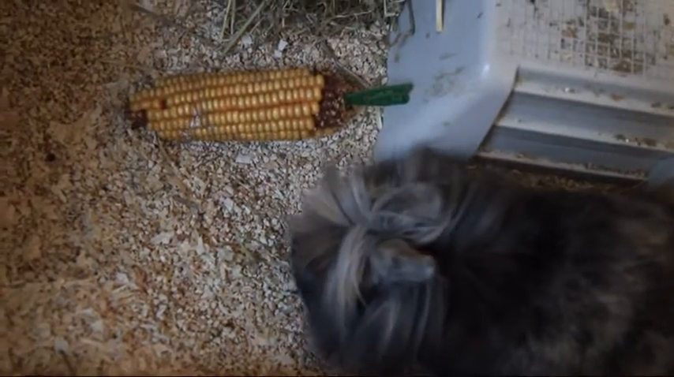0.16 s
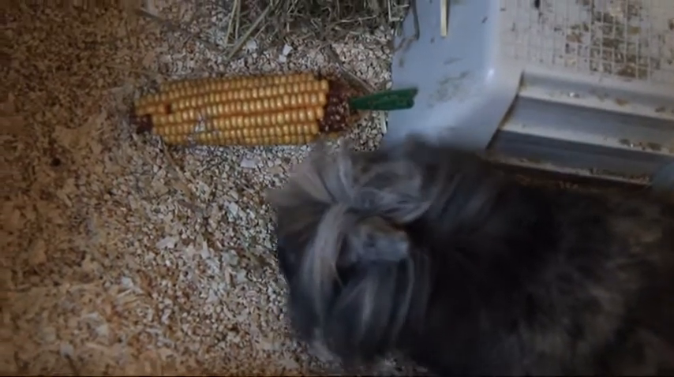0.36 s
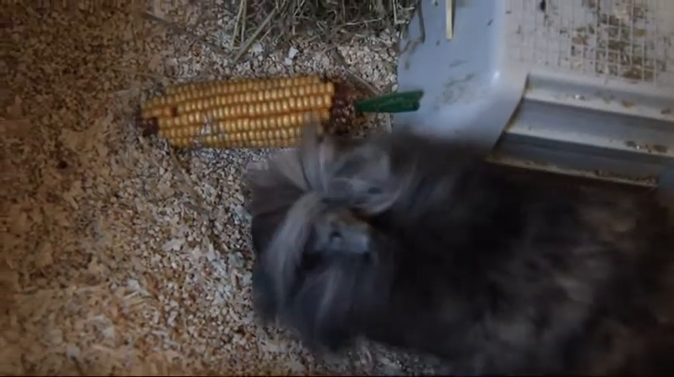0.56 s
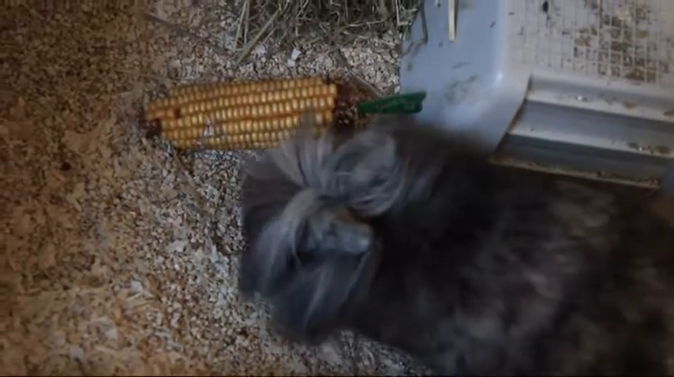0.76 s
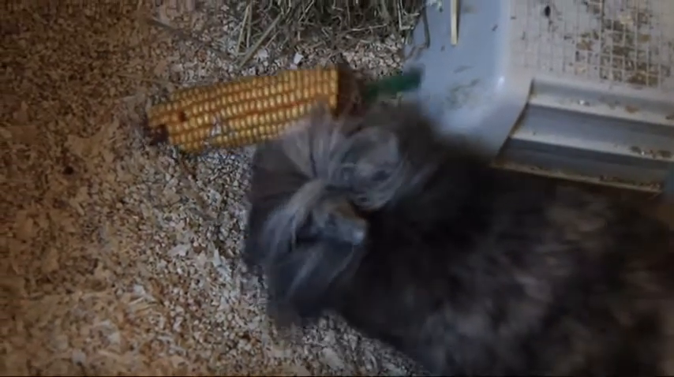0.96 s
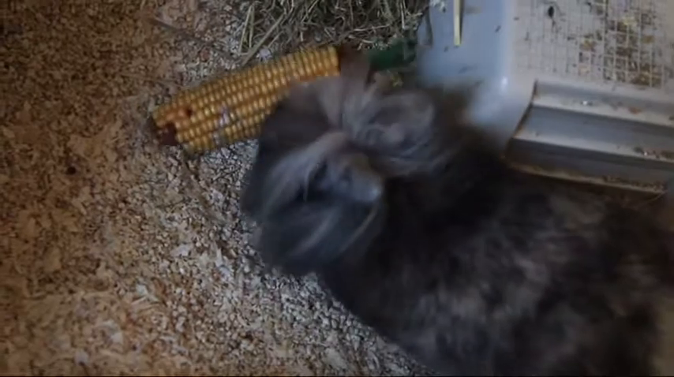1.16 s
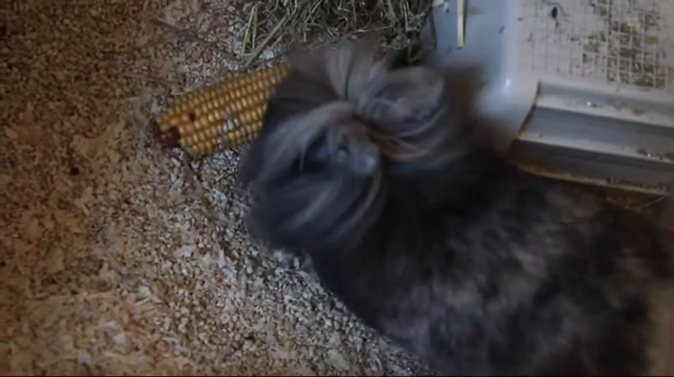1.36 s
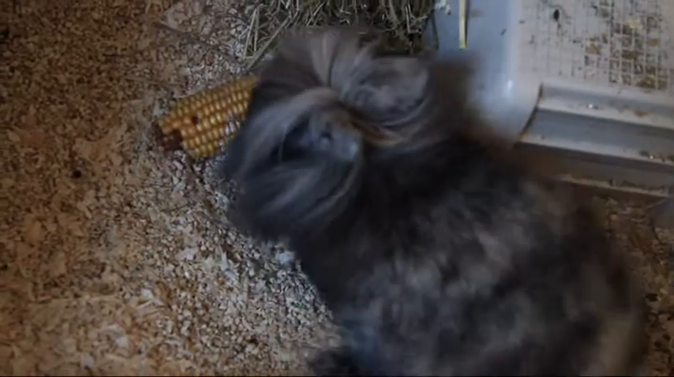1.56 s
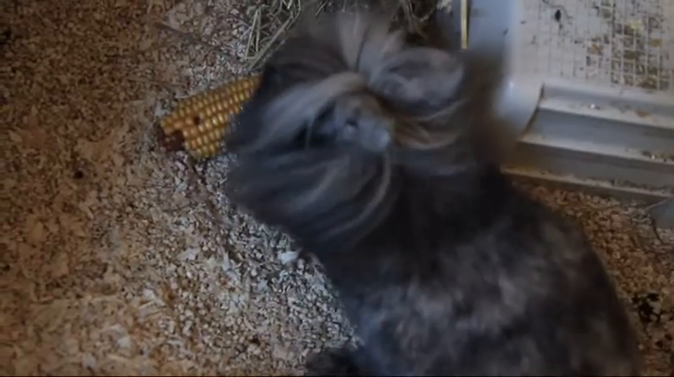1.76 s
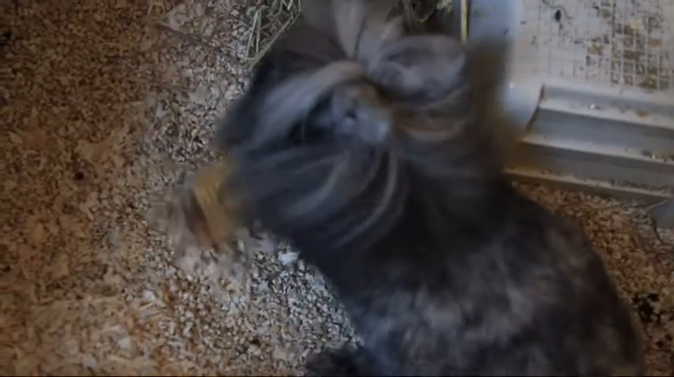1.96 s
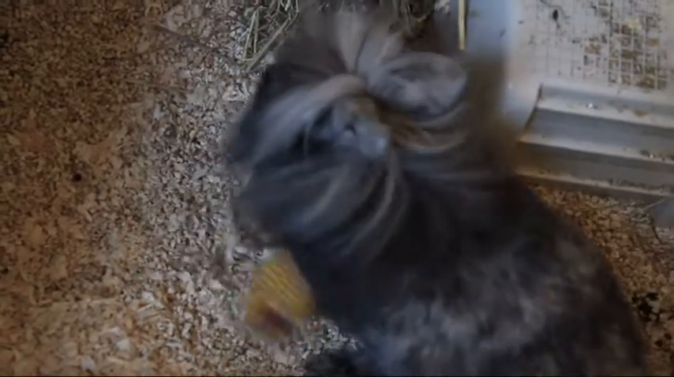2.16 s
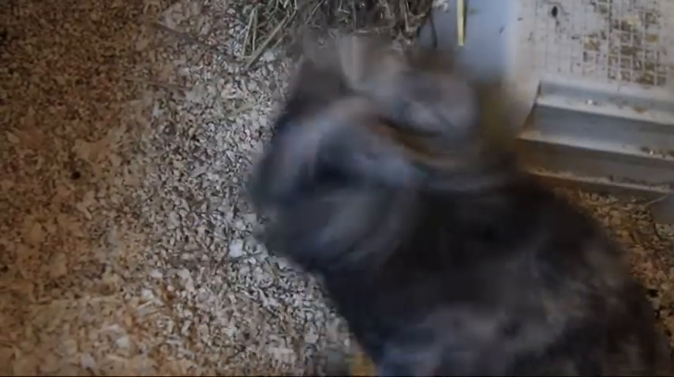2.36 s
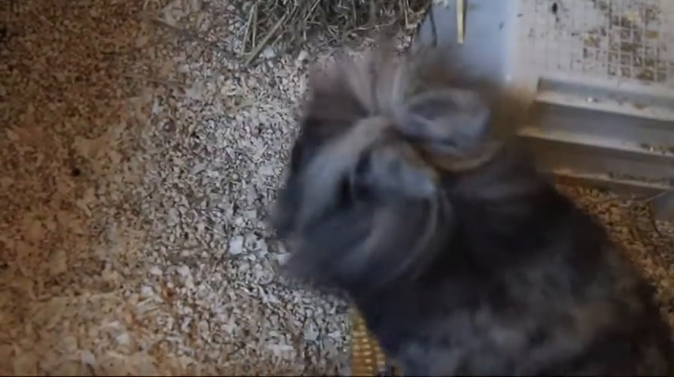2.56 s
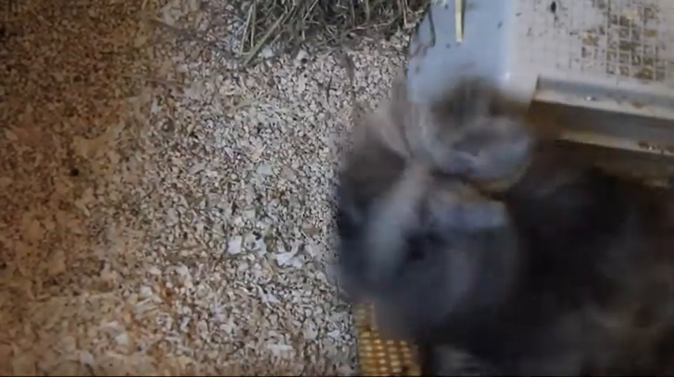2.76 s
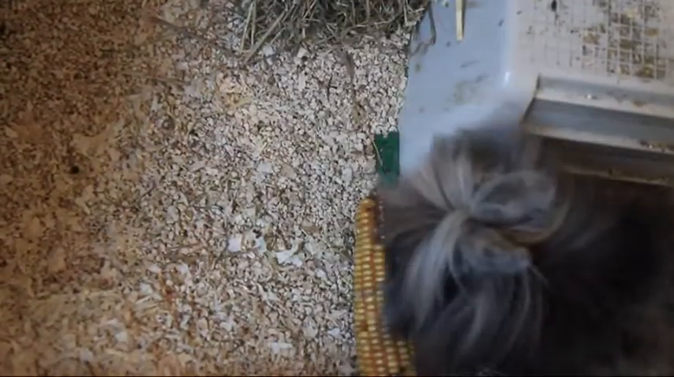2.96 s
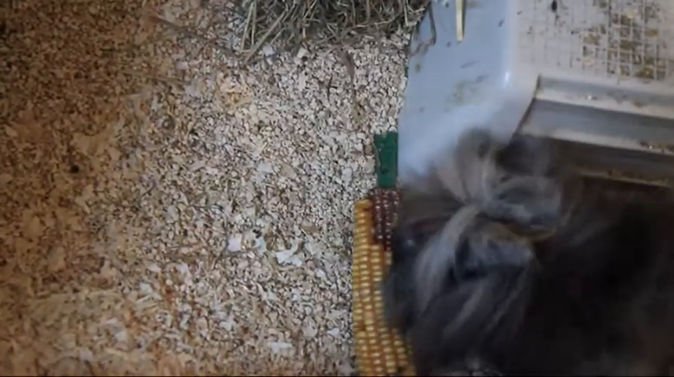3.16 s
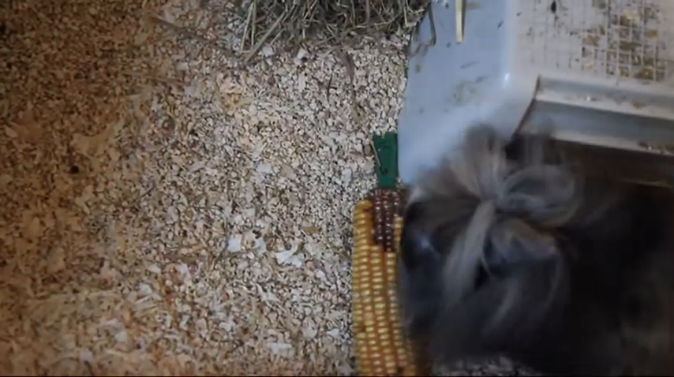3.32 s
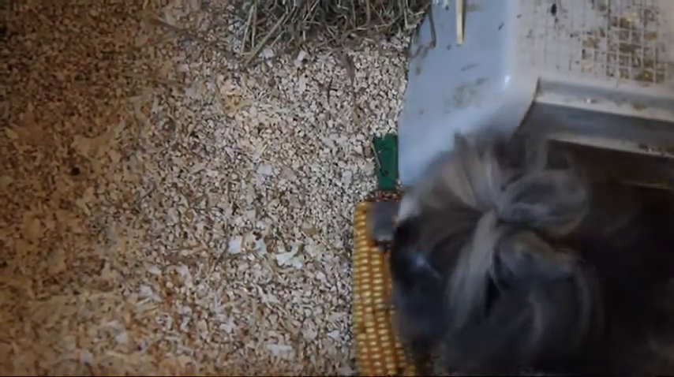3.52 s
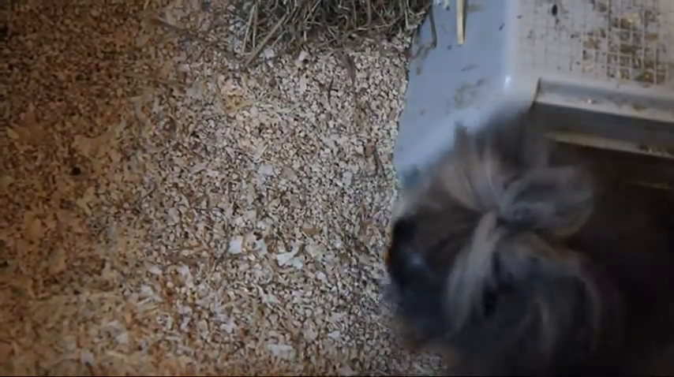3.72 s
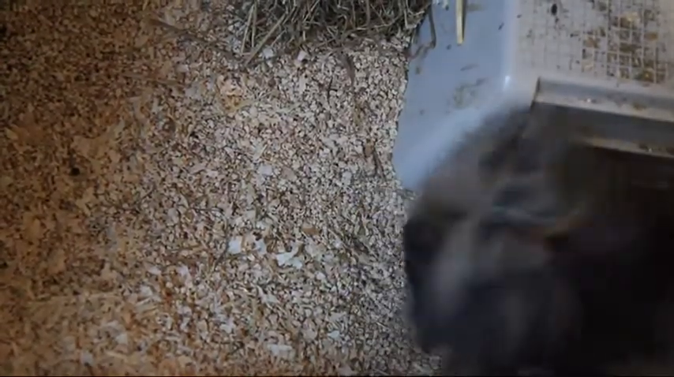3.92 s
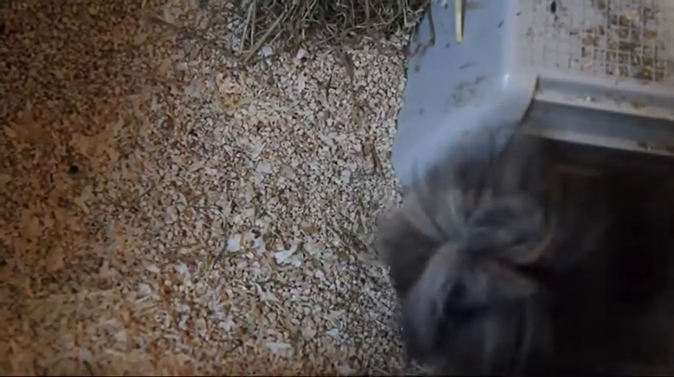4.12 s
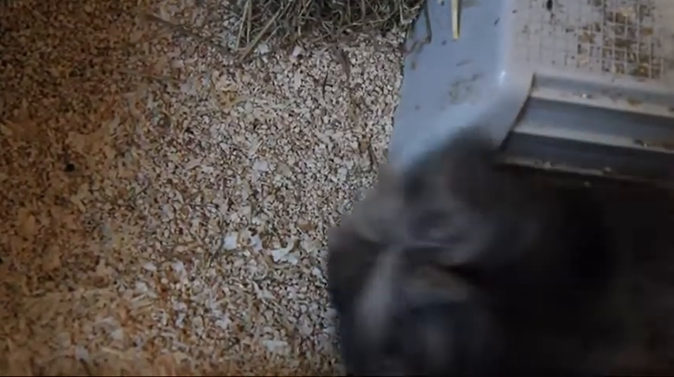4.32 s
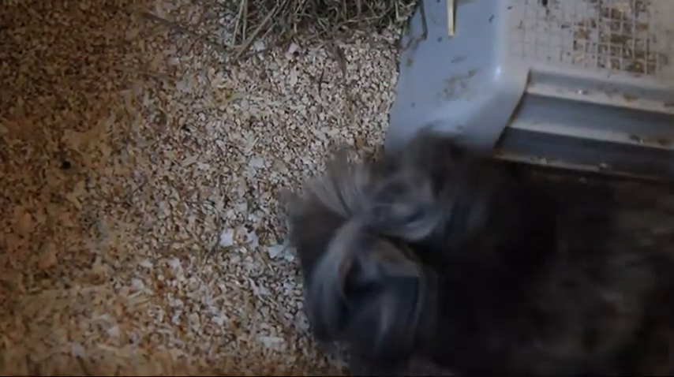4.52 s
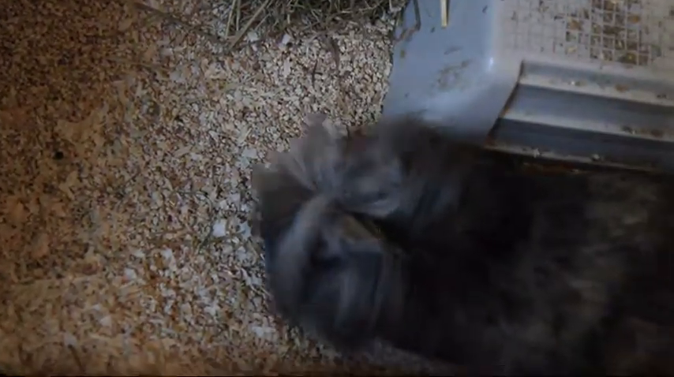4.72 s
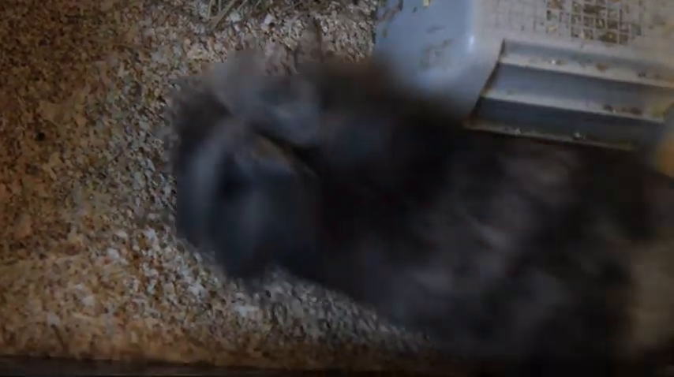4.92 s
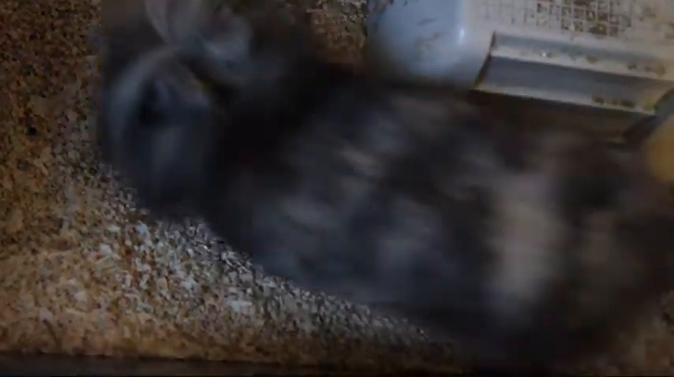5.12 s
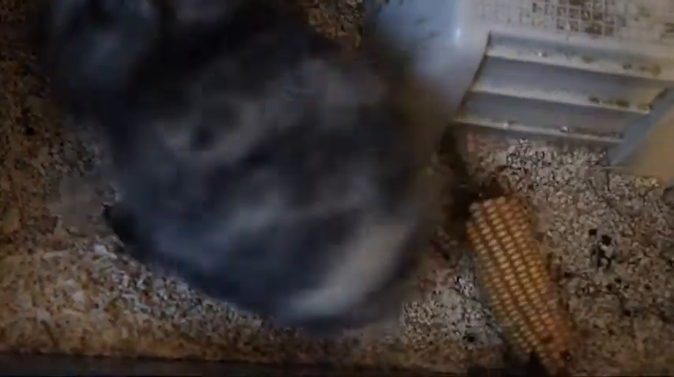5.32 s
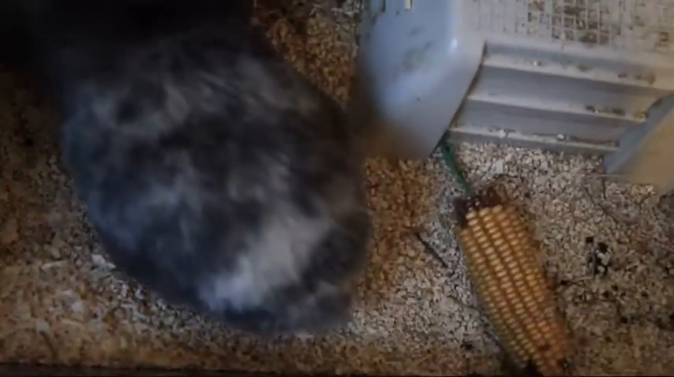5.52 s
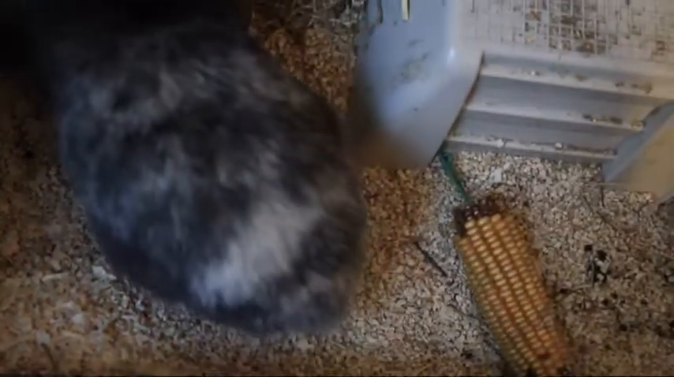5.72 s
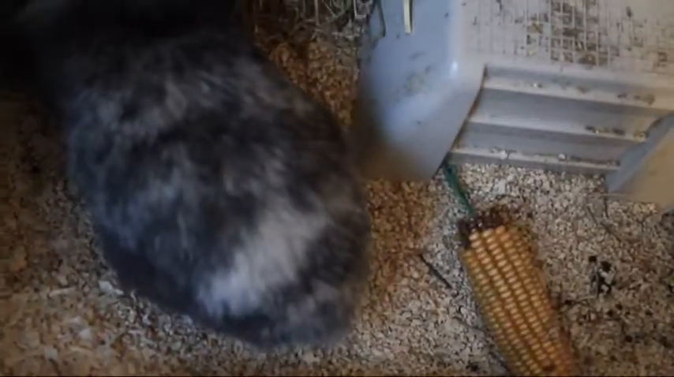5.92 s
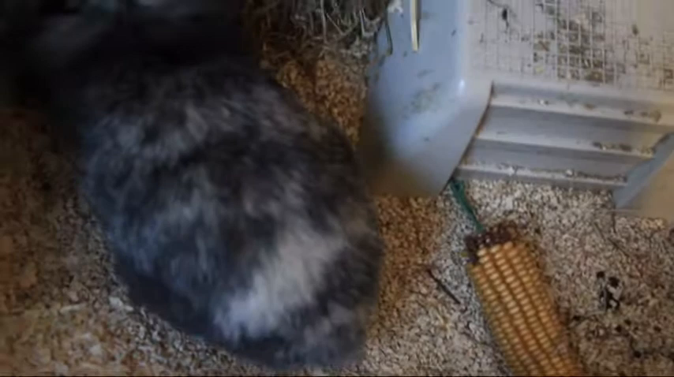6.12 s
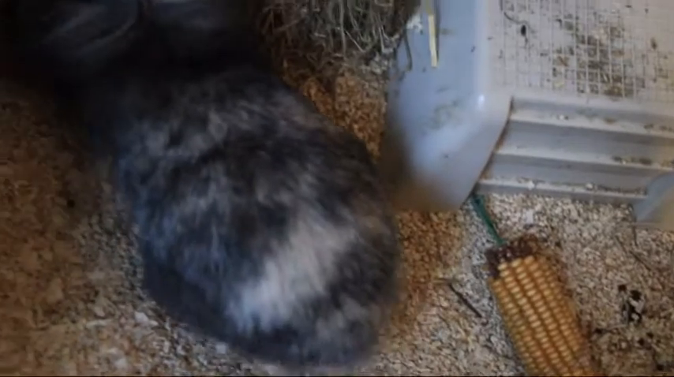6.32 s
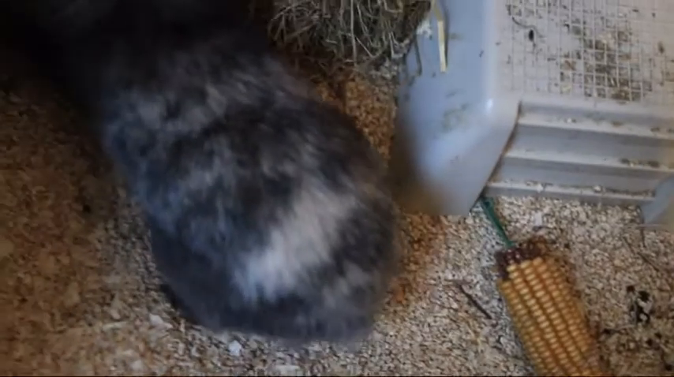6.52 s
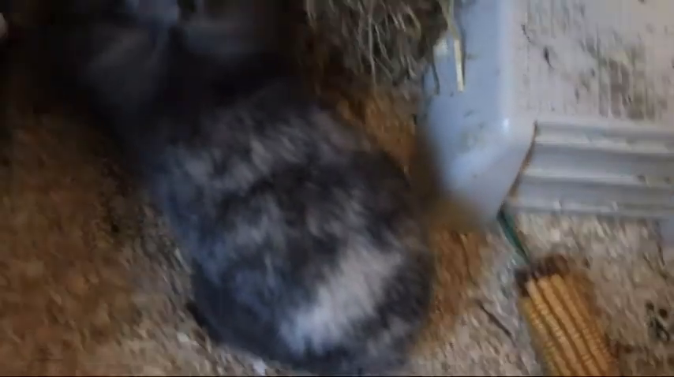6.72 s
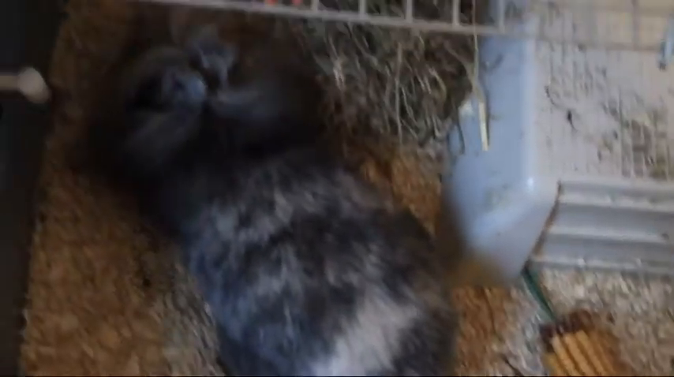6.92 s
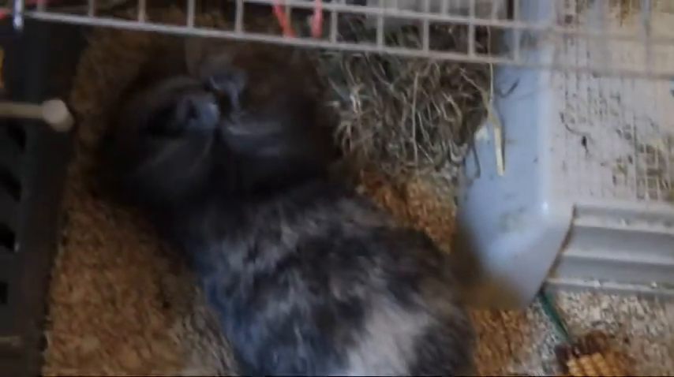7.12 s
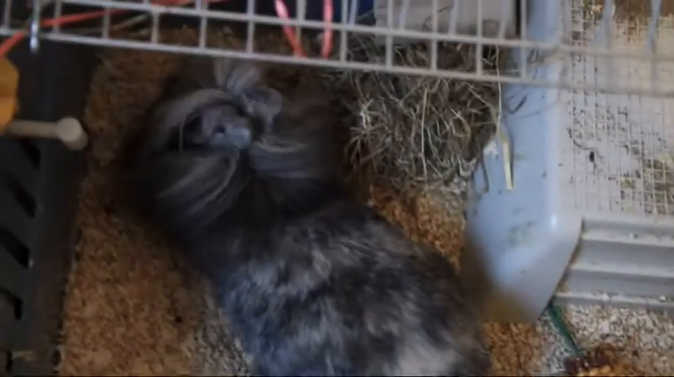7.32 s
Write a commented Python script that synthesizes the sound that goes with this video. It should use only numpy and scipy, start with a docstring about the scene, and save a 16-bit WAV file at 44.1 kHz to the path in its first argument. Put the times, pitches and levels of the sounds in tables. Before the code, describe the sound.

Close microphone, small hard-walled cage, soft room hiss and machine hum. Bedding barely stirs, then a short clatter of cob against plastic opens a run of crunchy shoves, snapping chips and muffled paw thumps. After a short lull, another flurry peaks in a hard crack and thud. A few crisp rustles follow as the animal moves off, with light knocks and trickling flakes.

```python
"""In a quiet room with a faint machine whir, a rabbit stirs bedding in a plastic cage tray and shoves a dry cob.
Damped modes sound the cob's knocks on tray and hutch and the thumps under the paws.
Short resonant noise bursts make chips and stalks snap; close walls echo the snaps, knocks and rattles.
Dense random grains make shavings fizz, hay tick and chips scrape; slower slips rumble the tray floor."""
import sys
import numpy as np
from scipy import signal
from scipy.fft import rfft, irfft, next_fast_len
from scipy.io import wavfile
from scipy.ndimage import uniform_filter1d

SR = 44100
rng = np.random.default_rng(int(sys.argv[2]) if len(sys.argv) > 2 else 0)


def master_out(mix):
    """Clip the mix to full scale and print it as 16-bit PCM to the path in sys.argv[1]."""
    frames = np.transpose(np.atleast_2d(mix))
    ceiling = np.clip(frames, -1, 1)
    pcm = np.round(ceiling * 32767).astype(np.int16)
    wavfile.write(sys.argv[1], SR, pcm)


N = 325458  # samples


def gain_of(db):
    """Decibel law: amplitude grows tenfold per 20 dB."""
    return 10 ** (np.asarray(db) / 20)


def unit_rms(x):
    """Normalisation: scales a signal to unit effective value."""
    return x / np.sqrt(np.mean(x ** 2) + 1e-20)


def curves(rows):
    """Linear interpolation: turns rows of (time, values...) into one curve per value."""
    s, *columns = np.transpose(rows)
    t = np.arange(N) / SR
    return [np.interp(t, s, column) for column in columns]


def add(mix, s, sound):
    """Superposition: adds a sound into the mix at time s."""
    part = mix[max(round(s * SR), 0):][:len(sound)]
    part += sound[:len(part)]


def high_pass(x, hz):
    """Second-order high-pass: attenuates what lies below the corner frequency."""
    return signal.lfilter(*signal.butter(2, hz, "high", fs=SR), x)


def coloured(x, points):
    """Spectral shaping: weights x by a (Hz, dB) curve, then gives it unit effective value."""
    f, db = np.transpose(points)
    size = next_fast_len(len(x))
    hz = np.fft.rfftfreq(size, 1 / SR)
    weight = gain_of(np.interp(np.log(hz + 1), np.log(f + 1), db))
    return unit_rms(irfft(rfft(x, size) * weight, size)[:len(x)])


def resonate(x, hz, width):
    """Heterodyne resonance: shifts the pitch curve hz down to zero, smooths, and shifts back."""
    turn = np.exp(2j * np.pi * np.cumsum(hz * np.ones(len(x))) / SR)
    r = np.exp(-np.pi * width / SR)
    smooth = signal.lfilter([1 - r], [1, -r], x / turn + 1e-18)
    return 2 * (turn * smooth).real


def grains(per_s, spread_db):
    """Shot noise: clicks at random times, with random sizes."""
    size = gain_of(spread_db * np.minimum(rng.exponential(1, N), 5))
    return unit_rms(size * rng.standard_normal(N) * (rng.random(N) < per_s / SR))


def steadied(x, span_s):
    """Envelope division: removes slow swells, so that the level follows the motion alone."""
    return x / np.sqrt(uniform_filter1d(x ** 2, round(span_s * SR)) + 1e-12)


# Spectrum of the room air: pitch_hz [Hz], relative level_db [dB per Hz]
ROOM_SPECTRUM = [(20, -28), (60, -10), (100, 5), (200, -4), (350, -0.5), (690, -4), (1400, -7), (2000, -21),
                 (3000, -15), (4000, -17), (7000, -21.5), (13600, -26), (15200, -17), (16800, -11)]
ROOM_DB = -59.5
# Bands of the machine whir: pitch_hz [Hz], width_hz of the first filter [Hz], level_db before drift [dB]
WHIR_BANDS = [(80.8, 7.2, -60.5), (118.7, 5.9, -61), (148.2, 8.4, -62), (906, 54, -69), (1217, 155, -61),
              (1532, 49, -61.5), (2280, 21, -86), (2545, 73, -66), (3410, 210, -65), (4460, 150, -70.5),
              (4860, 72, -76.5)]
# Slow drift of the whole whir: time_s [s], level_db [dB]
WHIR_DRIFT = [(0, -2.5), (1.5, -3.5), (3, -4), (4.5, -5), (6, -3.5), (7.38, -3.5)]
FLUTTER_DB, FLUTTER_S = 2.5, 0.039  # each band flutters on its own: rms depth [dB], smoothing span [s]


def room():
    """Stationary noise: steady air and microphone hiss, and a whir of fuzzy fixed bands."""
    air = gain_of(ROOM_DB) * coloured(rng.standard_normal(N), ROOM_SPECTRUM)
    noise, whir, span = rng.standard_normal(N), np.zeros(N), round(FLUTTER_S * SR)
    for hz, width, db in WHIR_BANDS:
        flutter = rng.standard_normal(N)
        flutter = unit_rms(uniform_filter1d(uniform_filter1d(flutter, span), span))
        band = unit_rms(resonate(resonate(noise, hz, width), hz, 2 * width))
        whir += gain_of(db + FLUTTER_DB * flutter) * band
    return air + whir * gain_of(curves(WHIR_DRIFT)[0])


def cage(x):
    """Early reflections: close walls throw back a short scatter of echoes."""
    t = np.arange(6000) / SR
    signs = rng.choice([-1., 1.], len(t))
    present = (rng.random(len(t)) < .06) * (t > .002)
    taps = signs * present * gain_of(-60 * t / 0.034)
    return signal.oaconvolve(x, taps / np.linalg.norm(taps))[:N]


# Bedding moves (shoves, scratches, steps): start_s [s], rise_s [s per 20 dB], hold_s [s; sign ignored],
# fall_s [s per 20 dB], fizz_db, tick_db, scrape_db, crunch_db, rumble_db [dB]; rise and fall have lower limits
MOVES = [(0.031, 0.1, 0, 0.14, -63.5, -59, -51.5, -70, -49.5),
         (.376, 0.16, 0, 0.18, -70, -57, -57, -53, -59), (0.552, 1.3, 0.14, 1, -66, -62.5, -59, -66, -58),
         (1.04, 0.19, 0.061, 0.24, -49.5, -50.5, -57, -51, -55),
         (1.095, 0, 0.0033, 0.04, -42, -39.5, -37, -38, -34.5),
         (1.14, .05, 0, 0.1, -60, -64, -66, -51, -51), (1.275, 0.26, 0, 0.8, -57.5, -58, -57, -57, -55.5),
         (1.416, -0.7, 0, 1.4, -59, -53.5, -66, -66, -57),
         (1.455, -0.37, 0, 0.1, -62, -49.5, -53.5, -66, -64),
         (1.668, -0.03, 0, .065, -40, -39.5, -37, -42, -39.5),
         (1.8, 0.5, 0.0035, 0.3, -58, -67, -55.5, -67, -52),
         (1.952, -0.09, 0.004, 0.87, -47, -49, -56, -67.5, -45.5),
         (2.032, 0.09, .03, 0.3, -41, -41.5, -48.5, -45, -50),
         (2.138, -0.1856, 0, .05, -39, -45, -42, -33.5, -30.5),
         (2.166, 0.05, 0.067, 0.15, -41, -39.5, -44.5, -56, -43.5),
         (2.314, -0.1, 0.08, 0.02, -51, -43.5, -46, -65, -58),
         (2.414, 0.09, 0.028, 0.11, -40, -40, -41, -46.5, -39.5),
         (2.473, 0.0365, 0.013, 0.06, -34.5, -40, -34.5, -34.5, -32.5),
         (2.52, -0.16, 0, .06, -46, -48, -42.5, -50, -39), (2.651, .2, 0, 0.5, -69, -72, -66, -75, -54.5),
         (2.727, 0.06, 0, 0.17, -49.5, -44.5, -51, -54.5, -47),
         (2.807, 0.05, 0.0037, 0.12, -49, -47.5, -43.5, -56, -45),
         (2.907, 0.22, 0.027, .11, -48, -51, -47, -55, -44.5),
         (3.117, .12, 0.084, 1, -60, -59, -58, -70, -53.5),
         (3.256, 0.03, 0.0028, 0.05, -44, -41, -40, -37.5, -35.5),
         (3.4, 0.6, 0, 1.3, -64, -63, -59, -63, -68.5), (3.638, 0.01, 0.011, 0, -40, -51, -48, -54.5, -43),
         (3.694, 0.15, 0.073, 0.14, -46, -43, -51, -53, -46.5),
         (3.79, 0.06, 0.015, 0.11, -43, -48, -43, -55, -39),
         (3.846, 0.1, 0.033, 0.07, -45, -38, -45, -60, -48),
         (3.885, 0.01, 0.051, 0.1, -39, -40.5, -36, -43.5, -38.5),
         (4.1, 0.1, 0.041, 0.2, -54, -51.5, -57, -65, -65),
         (4.154, 0.09, 0.015, 0.12, -44, -46, -43.5, -48.5, -38.5),
         (4.215, 0.03, 0, 0.05, -50, -54, -50, -49, -44),
         (4.307, 1.45, 0.0079, .07, -63, -62.5, -61, -61, -49),
         (4.438, -0.3, 0.015, 0.02, -54, -59, -55, -53, -51.5),
         (4.597, 0.68, 0, 0.25, -64, -59.5, -59, -55, -57),
         (4.94, 0.45, 0, 1.6, -58, -57.5, -55, -59.5, -55),
         (5.016, .1, 0.025, -0.2, -62, -65, -66, -51.5, -47),
         (5.135, 0.07, 0.011, 0.1, -43, -44.5, -42.5, -51, -44),
         (5.2, 0.04, 0, 0.2, -43.5, -49.5, -50, -69, -56),
         (5.29, 0.52, 0.014, -0.1, -70, -59, -54, -50.5, -50.5),
         (5.368, -0.01, 0, 0.18, -37.5, -43.5, -46.5, -57, -63),
         (5.414, 0.13, 0, 0.15, -55, -53, -50, -45.5, -46.5),
         (5.531, -0.06, 0.0074, 0.05, -50.5, -54.5, -56, -50, -45),
         (5.735, 0.3, 0, 0.43, -61, -57.5, -58, -57, -57),
         (6.157, .16, .05, 1, -61, -73, -61, -62.5, -54.5),
         (6.23, -0.04, 0.065, 0.48, -43, -46.5, -63, -54, -51.5),
         (6.338, 0.21, 0.1, 0.12, -42, -42, -43.5, -47, -64.5),
         (6.454, 0.13, 0.057, .1, -34, -40, -35, -53, -52), (6.61, 0.2, 0, -0.2, -54.5, -58, -53, -71, -60),
         (6.7, 0.47, 0, 0.4, -54, -53.5, -54.5, -65, -58), (6.795, -0.06, 0, 0.14, -46, -51, -54, -62, -65),
         (6.869, 0.03, 0.00062, 0.08, -46.5, -47, -51, -44, -46.5),
         (6.995, -0.03, 0.015, .1, -50, -51, -53, -45, -48.5),
         (7.032, 0.04, 0.022, 0.29, -42.5, -47, -52, -42, -53),
         (7.102, 0.17, 0.054, 0.13, -41, -42.5, -43.5, -46, -51.5),
         (7.3, 1.5, .08, .2, -60, -60, -58.5, -66, -59.5)]
# Faint stirring between moves: fizz_db, tick_db, scrape_db, crunch_db, rumble_db [dB]
REST_DB = [-68.5, -79, -79, -92, -72.5]
# Trickle after a move, one column per layer in the same order: level_db relative to the move [dB]
SETTLE_DB = [-27, -25, -35, -32, -16.5]
# Decay of that trickle, one column per layer: fall_s [s per 20 dB]
SETTLE_S = [0.1, 0.23, .3, 0.4, 0.31]


def motion():
    """Power addition: each move rises, holds, falls and settles slowly, giving five layer levels in dB."""
    t = np.arange(0, N / SR + .004, .002)
    power = gain_of(REST_DB)[:, None] ** 2 * np.ones(len(t))
    for s, rise, hold, fall, *db in MOVES:
        early = np.maximum(s - t, 0)
        late = np.maximum(t - s - abs(hold), 0)
        up = gain_of(np.array(db)[:, None] - 20 * early / max(rise, .004))
        down = gain_of(-20 * late / max(fall, .01))
        settle = gain_of(np.array(SETTLE_DB)[:, None] - 20 * late / np.array(SETTLE_S)[:, None])
        power = power + up ** 2 * (down ** 2 + settle ** 2)
    return curves(np.vstack([t, 10 * np.log10(power)]).T)


SHUDDER_HZ, SHUDDER_DB = 54, -13  # first resonance [Hz], level relative to the rumble [dB]


def shudder(rumble_db):
    """Low-frequency resonance: the cage stand shakes softly in step with the tray rumble."""
    shake = resonate(resonate(rng.standard_normal(N), SHUDDER_HZ, 65), 32, 70)
    return gain_of(rumble_db + SHUDDER_DB) * unit_rms(shake)


FLOOR_HZ, FLOOR_HZ_PER_DB = 294, 3.5  # floor pitch at a rumble of -45 dB; load stiffens the floor
CRUNCH_HZ, CRUNCH_HZ_PER_DB = 722, 15  # scraping above the rumble level makes the crunch higher


def tray(crunch_db, rumble_db, scrape_db):
    """Stick-slip excitation: uneven slips shake the loaded floor, and pressed bedding crunches above it."""
    floor_hz = FLOOR_HZ + FLOOR_HZ_PER_DB * (rumble_db + 45)
    crunch_hz = CRUNCH_HZ + CRUNCH_HZ_PER_DB * (scrape_db - rumble_db)
    slips = grains(per_s=600, spread_db=-2.0)
    loaded = resonate(resonate(slips, floor_hz, 177), floor_hz, 350)
    free = resonate(resonate(slips, 136, 270), 210, 470)
    pressed = grains(per_s=2200, spread_db=1.25)
    crunch = resonate(resonate(pressed, crunch_hz, 570), crunch_hz, 1600)
    rumble = high_pass(unit_rms(loaded) + 0.84 * unit_rms(free), 95)  # no deep bass
    return gain_of(rumble_db) * steadied(rumble, 0.037) + gain_of(crunch_db) * steadied(crunch, 0.072)


# Paws and cob thumping the tray: start_s [s], level_db [dB], pitch_hz [Hz], t60_s [s, limited to .01-.12]
THUMPS = [(0.022, -32.5, 189, 0.072), (0.251, -36.5, 316, 0.039), (0.513, -38, 300, 0.038),
          (1.009, -34, 400, 0.074), (1.033, -35, 293, 0.059), (1.073, -28, 332, 0.075),
          (1.273, -32.5, 200, 0.073), (1.584, -35.5, 272, 0.058), (1.659, -17.5, 266, 0.059),
          (1.691, -29, 182, 0.043), (1.744, -39, 294, 0.065), (1.932, -34.5, 425, 0.067),
          (1.988, -26.5, 340, 0.091), (2.008, -21.5, 400, 0.046), (2.034, -25.5, 347, 0.055),
          (2.127, -17, 344, 0.046), (2.237, -27, 343, 0.092), (2.3, -27.5, 269, 0.055),
          (2.396, -29, 154, 0.087), (2.43, -24, 161, 0.038), (2.464, -16, 517, 0.038),
          (2.506, -26, 244, 0.086), (2.705, -36, 300, 0.081), (2.806, -16.5, 322, 0.085),
          (2.82, -21, 297, 0.05), (2.839, -17, 310, 0.062), (2.856, -30, 168, 0.043),
          (2.925, -29, 333, 0.039), (3.161, -33, 276, 0.11), (3.254, -23, 366, 0.073),
          (3.262, -23.5, 157, 0.096), (3.493, -37, 320, 0.054), (3.631, -26, 336, 0.051),
          (3.693, -29.5, 363, 0.06), (3.705, -25, 130, 0.064), (3.789, -27, 340, 0.081),
          (3.874, -7.5, 167, 0.033), (3.895, -16, 146, 0.051), (3.922, -20, 166, 0.06),
          (3.955, -21, 242, 0.057), (4.027, -27, 139, 0.12), (4.142, -25.5, 671, 0.14),
          (4.165, -22.5, 144, 0.045), (4.188, -25, 421, 0.1), (4.208, -22, 182, 0.055),
          (4.284, -30, 144, 0.11), (4.993, -28.5, 333, 0.085), (5.118, -28.5, 168, 0.049),
          (5.184, -33, 292, 0.052), (5.269, -36, 550, 0.054), (5.286, -36, 518, 0.073),
          (5.386, -33, 426, 0.062), (5.426, -34, 340, 0.055), (5.513, -34, 400, 0.055),
          (5.54, -35, 520, 0.08), (6.219, -33.5, 501, 0.11), (6.854, -33.5, 317, 0.024),
          (6.876, -36, 138, 0.14), (7.071, -34, 720, 0.091), (7.178, -35.5, 194, 0.087)]
# Modes of the whole tray: pitch_hz [Hz], level_db before random variation [dB], t60_s [s]
TRAY_MODES = [(171, -9, 0.092), (264, -22.5, 0.026), (288.6, -7, 0.059), (335.4, -13.5, 0.075),
              (425, -10, 0.034), (660, -14.5, 0.029)]


def thumps():
    """Modal excitation: a soft push rings the spot at its own pitch and the whole tray in its modes."""
    out, t = np.zeros(N), np.arange(8000) / SR
    tray_hz, tray_db, tray_t60 = np.transpose(TRAY_MODES)[:, :, None]
    for s, db, hz, t60 in THUMPS:
        spot = gain_of(-60 * t / np.clip(t60, .01, .12)) * np.sin(2 * np.pi * hz * t)
        mode_db = tray_db + rng.normal(0, 2.5, tray_hz.shape)
        modes = gain_of(mode_db - 60 * t / tray_t60) * np.sin(2 * np.pi * tray_hz * t)
        soft_onset = 1 - np.exp(-t / 0.0058)
        add(out, s, gain_of(db) * (spot + modes.sum(0)) * soft_onset)
    return high_pass(out, 100)  # a small tray radiates no deep bass


# The cob rattling on the hollow hutch: start_s [s], level_db [dB]
RATTLE = [(.989, -44.5), (1.036, -35), (1.0745, -26), (1.079, -19), (1.083, -14.5), (1.0875, -17),
          (1.092, -17), (1.0985, -26), (1.108, -34), (1.119, -23.5), (1.14, -34), (1.158, -34.5)]
# Modes of the hutch: pitch_hz before detuning [Hz], relative level_db [dB], t60_s [s]
HUTCH_MODES = [(490, -10, 0.061), (786, 8, 0.1), (960, 2.5, 0.11), (1360, 3.5, 0.048), (1570, 9, 0.058),
               (2320, 2.5, 0.036), (2750, -2, 0.063), (3230, -10, 0.054), (3730, -16, 0.042),
               (4110, -7, 0.047), (5050, -10, .05)]
# The cob knocking on the tray: start_s [s], level_db [dB], mode_factor on the pitches [ratio]
KNOCKS = [(1.663, -27, 0.84), (2.0385, -34, 0.84), (2.13, -16, 0.84), (2.3305, -17, 1), (2.471, -25, 0.82),
          (3.258, -31, 0.86), (3.8693, -7.5, 1.05), (4.144, -29.5, 0.98), (5.1295, -30.5, 0.91),
          (5.719, -36.5, 1.05), (6.3452, -28, 1.26), (6.462, -24, 1.1)]
# Modes of the knocking cob: pitch_hz before factor and detuning [Hz], relative level_db [dB], t60_s [s]
COB_MODES = [(442.4, -12.5, 0.21), (963, -5, 0.067), (1356, -5.5, 0.046), (1590, -4, 0.045),
             (1838, 4.5, 0.013), (2140, -4, 0.017), (2620, -12, 0.038), (2850, -10, 0.018),
             (4030, 1, 0.023), (4450, 11, 0.0072), (5660, 4, 0.011)]
DETUNE = 0.014  # rms share by which each blow shifts the modes, by where the object is held


def struck(blows, modes, crack):
    """Modal synthesis: each blow rings all modes, weighted by the spot hit, along with a short crack."""
    out, t = np.zeros(N), np.arange(10000) / SR
    hz, db, t60 = np.transpose(modes)[:, :, None]
    for s, level_db, *factor in blows:
        spot_db = rng.normal(0, 1.0, hz.shape)
        phase = rng.uniform(0, 2.1, hz.shape)
        shift = np.prod(factor) * (1 + DETUNE * rng.standard_normal(hz.shape))
        partials = gain_of(db + spot_db - 60 * t / t60) * np.sin(2 * np.pi * hz * shift * t + phase)
        ring = partials.sum(0) * np.minimum(t / .0008, 1)  # the contact lasts a moment
        tick = resonate(rng.standard_normal(len(t)), 5600, 6600) * gain_of(-60 * t / 0.0033)
        add(out, s, gain_of(level_db) * (ring / abs(ring).max() + crack * tick / abs(tick).max()))
    return out


SMALL_RING_DB, SMALL_CRACK_DB = -13, 11  # least levels relative to the fizz [dB]
SMALL_SPREAD_DB, SMALL_T60 = 6, 0.011  # scale of the random excess [dB], decay of the burst [s]


def small_snaps(fizz_db, count):
    """Random point process: little snaps at random times, whose strength follows the stirring."""
    when, pitch, ring, crack = rng.uniform([0, 0, .2, .2], 1, (count, 4)).T
    s = when * (N - 1) / SR
    db = fizz_db[(s * SR).astype(int)]
    ring_db = db + SMALL_RING_DB - SMALL_SPREAD_DB * np.log(ring)
    crack_db = db + SMALL_CRACK_DB - SMALL_SPREAD_DB * np.log(crack)
    return list(zip(s, ring_db, 1500 * 5.5 ** pitch, crack_db, np.full(count, SMALL_T60)))


# The loudest snapping chips and stalks: start_s [s], ring level_db before the bass limit [dB],
# pitch_hz [Hz], bright crack level_db before the bass limit [dB], t60_s of the burst [s]
SNAPS = [(.2558, -40, 4300, -46, 0.02), (.361, -32, 3100, -44, .036), (.8361, -44, 1510, -64, .018),
         (1.031, -31, 4570, -45, 0.016), (1.1906, -51, 1510, -34, .015), (1.243, -40.5, 6460, -35, .016),
         (1.2737, -34, 1850, -48, 0.042), (1.3467, -57, 1720, -37, .015), (1.41, -34.5, 4260, -49, 0.017),
         (1.446, -26.5, 4100, -24.5, 0.058), (1.537, -40, 4690, -41, 0.011), (1.5844, -53, 5070, -35, .017),
         (1.6638, -25, 1520, -26, 0.027), (1.7551, -47, 8480, -28, 0.012), (1.7678, -43, 2280, -24, .011),
         (1.9073, -23.5, 4800, -45, .023), (1.9146, -50, 4780, -20, 0.017),
         (1.9288, -49.5, 4000, -15.5, 0.021), (1.975, -21.5, 5360, -19.5, .025),
         (2.0395, -17.5, 4750, -32, 0.0056), (2.079, -21.5, 4470, -36, 0.031),
         (2.129, -12, 2770, -35, 0.012), (2.1651, -22, 5000, -18, 0.012), (2.1861, -22, 1510, -31, 0.03),
         (2.2213, -29, 4220, -22, .015), (2.235, -18, 4100, -21, 0.033), (2.3063, -35, 2970, -25, 0.017),
         (2.3289, -16, 1810, -39, 0.039), (2.3777, -23.5, 1670, -21, 0.021), (2.384, -45, 6850, -17, .015),
         (2.4235, -42, 7450, -11, 0.016), (2.4698, -19, 1620, -25, 0.014), (2.488, -31, 2450, -19, .015),
         (2.4766, -40, 5940, -16, 0.016), (2.7182, -21.5, 4350, -38, 0.012),
         (2.7275, -19, 4640, -17.5, 0.021), (2.798, -28.5, 4200, -30, 0.06),
         (2.8625, -37.5, 1510, -23, 0.025), (2.8885, -34, 3320, -26, 0.05),
         (2.924, -27.5, 1510, -33, 0.028), (3.063, -48, 2580, -37, .016), (3.106, -54, 3360, -35, .015),
         (3.256, -26, 1590, -32, 0.018), (3.3259, -27, 1670, -44, 0.018), (3.3855, -25.5, 8340, -28, 0.016),
         (3.4937, -40, 2410, -48, 0.017), (3.6372, -22, 6000, -24, 0.022), (3.654, -31, 6420, -33, .018),
         (3.667, -32, 6420, -28, 0.031), (3.6942, -26, 3730, -12.5, 0.031),
         (3.7004, -17.5, 5700, -37, .018), (3.7325, -29, 2410, -21, 0.03),
         (3.809, -10.5, 7100, -14.5, 0.024), (3.8387, -24, 6200, -14, 0.047),
         (3.8485, -29, 7620, -13, 0.019), (3.8695, -3, 2100, -6.5, 0.018), (3.925, -24, 2630, -15, 0.022),
         (3.986, -26.5, 1640, -43, 0.022), (4.081, -43, 1540, -25, 0.017), (4.1033, -26, 5510, -37, 0.017),
         (4.1451, -22, 1700, -14.5, 0.027), (4.183, -42.5, 6500, -14, 0.018),
         (4.2139, -27.5, 1600, -34, .027), (4.2418, -42, 7020, -31.5, .015),
         (4.3824, -49.5, 1550, -36, 0.017), (4.58, -32.5, 2740, -36.5, .026),
         (5.1289, -21, 1560, -37, 0.019), (5.164, -28.5, 1770, -21, 0.019),
         (5.1912, -30, 4100, -6.5, 0.018), (5.1553, -44, 2540, -22.5, .015),
         (5.1962, -37, 7410, -31, 0.013), (5.2322, -34, 4130, -48.5, 0.023), (5.447, -40, 5000, -26, .015),
         (5.7201, -32.5, 2780, -39.5, 0.013), (6.3444, -21, 8500, -2, 0.021),
         (6.3562, -46, 8050, -6, 0.0082), (6.4631, -17.5, 1640, -32, .023), (6.535, -40, 1500, -12, 0.012),
         (6.5446, -38, 5380, -16, 0.018), (6.5703, -21.5, 8100, -37, .015), (6.6003, -27, 7710, -30, 0.013),
         (6.6224, -51, 7840, -27, .015), (6.6779, -50, 2890, -32, .015), (6.7035, -51, 1510, -31, 0.017),
         (6.7384, -45, 2540, -32, .015), (6.7851, -36, 7580, -31.5, 0.017), (7.0606, -48, 4650, -32, 0.013)]
SNAP_RISE_S = 0.0015  # soft onset of each snap's noise burst
RING_WIDTH = 0.32  # width of the first ring filter, as a share of the pitch
SHOULDER, CLICK, SNAP_LOW_HZ = 0.39, 3.46, 920  # broad shoulder's gain, size of the click, bass limit [Hz]


def snaps(rows):
    """Impulsive fracture: a short burst excites a ring with a broad shoulder, and a bright crack."""
    out, t = np.zeros(N), np.arange(2000) / SR
    for s, ring_db, hz, crack_db, t60 in rows:
        decay = gain_of(-60 * t / max(t60, .003))
        burst = rng.standard_normal(len(t)) * decay * np.minimum(t / SNAP_RISE_S, 1)
        burst[45] += CLICK  # the break itself is one sharp click
        burst[102] += 2.5 * rng.standard_normal()  # its echo off the tray floor
        ring = resonate(resonate(burst, hz, RING_WIDTH * hz), hz, 1.5 * hz)
        ring = ring + SHOULDER * resonate(burst, 2500, 4000)
        crack = resonate(resonate(burst, 10640, 7500), 12600, 8000)
        ring_part = gain_of(ring_db) * ring / abs(ring).max()
        add(out, s, ring_part + gain_of(crack_db) * crack / abs(crack).max())
    return high_pass(out, SNAP_LOW_HZ)  # chips are too small for bass


# Spectrum of the fizzing flakes: pitch_hz [Hz], relative level_db [dB per Hz]
FLAKES = [(4000, -43), (6500, -7), (8000, -2.5), (10200, -0.5), (12200, 1), (13500, 0), (15200, -5.5),
          (16800, -8)]
# Spectrum of the ticking stalks: pitch_hz [Hz], relative level_db [dB per Hz]
STALKS = [(1500, -49), (2800, -3), (3500, 1), (4500, 1.5), (5500, 1.5), (7000, -2.5), (10000, -10.5)]
SCRAPE_HZ, SCRAPE_HZ_PER_DB = 1740, 23  # scrape pitch at equal levels; brighter moves scrape higher


def shavings(fizz_db, tick_db, scrape_db):
    """Granular friction: flakes fizz, hay stalks tick below them, and chips scrape in a broad moving band."""
    hz = SCRAPE_HZ + SCRAPE_HZ_PER_DB * (fizz_db - scrape_db)
    shared = grains(per_s=4400, spread_db=-1.5)  # shared grains sound in every band at once
    fizz = coloured(grains(per_s=15000, spread_db=1.5) + .5 * shared, FLAKES)
    tick = coloured(grains(per_s=6000, spread_db=-0.9) + .5 * shared, STALKS)
    chips = grains(per_s=2500, spread_db=0.0) + .5 * shared
    scrape = resonate(resonate(resonate(chips, hz, 2340), hz, 4100), hz, 4600)
    scrape = high_pass(scrape, 800)  # chips give no bass
    layers = (fizz_db, fizz), (tick_db, tick), (scrape_db, scrape)
    return sum(gain_of(db) * steadied(x, .05) for db, x in layers)


def scene():
    """Superposition: sums room, thumps, bedding and hits, with cage echoes of the hits."""
    fizz_db, tick_db, scrape_db, crunch_db, rumble_db = motion()
    breaks = snaps(SNAPS + small_snaps(fizz_db, count=110))
    rattle = struck(RATTLE, HUTCH_MODES, crack=0.27)
    knocks = struck(KNOCKS, COB_MODES, crack=0.57)
    hits = breaks + rattle + knocks
    floor = tray(crunch_db, rumble_db, scrape_db) + shudder(rumble_db)
    bedding = shavings(fizz_db, tick_db, scrape_db) + floor
    return (room() + gain_of(-9) * cage(hits) + thumps() + hits + bedding)[None]


TOP_HZ, TOP_DB = 15480, -26  # start of the weakened treble [Hz], its level [dB]
EDGE_HZ = 16800  # band limit


def record(dry):
    """Band limiting: the microphone loses deep bass and high treble; a soft limiter holds the peaks."""
    dry = high_pass(dry, 62)
    dry = dry / (1 + dry ** 6) ** (1 / 6)  # the soft limiter keeps peaks below full scale
    low = signal.oaconvolve(dry, signal.firwin(401, TOP_HZ, fs=SR)[None], "same")
    heard = low + gain_of(TOP_DB) * (dry - low)
    edge = signal.firwin(1023, EDGE_HZ, window=("kaiser", 9), fs=SR)
    return signal.oaconvolve(heard, edge[None], "same")


dry = scene()
out = record(dry)
master_out(out)
```